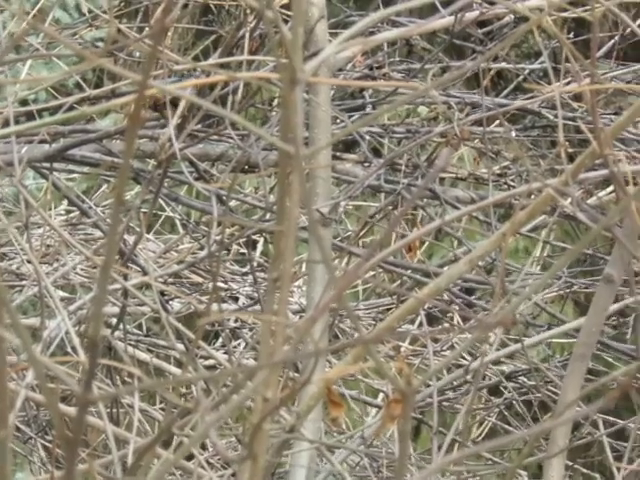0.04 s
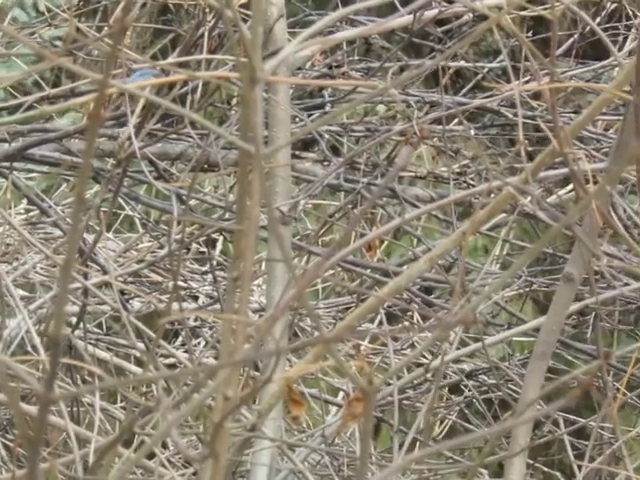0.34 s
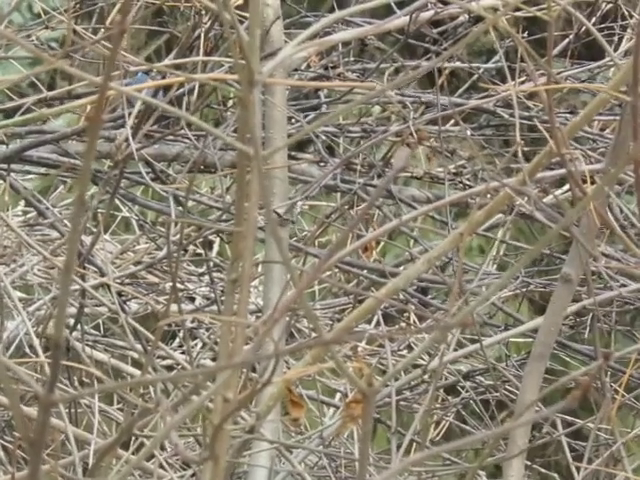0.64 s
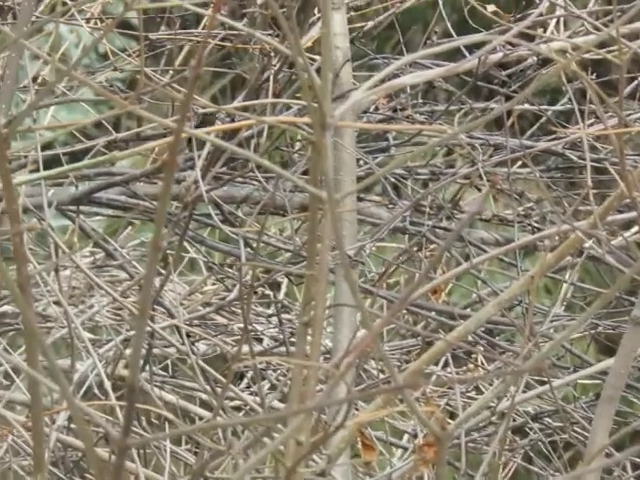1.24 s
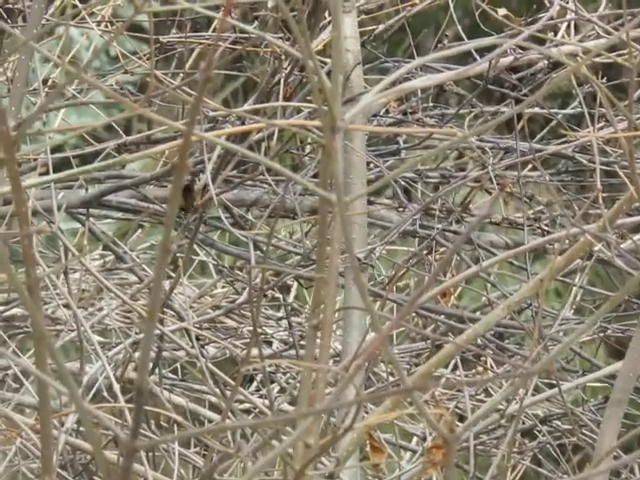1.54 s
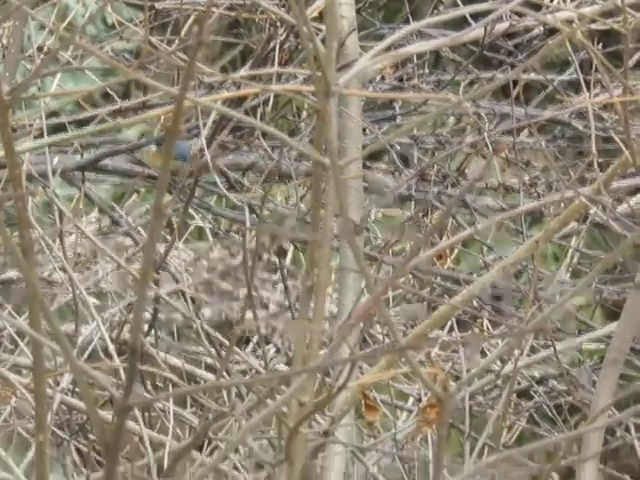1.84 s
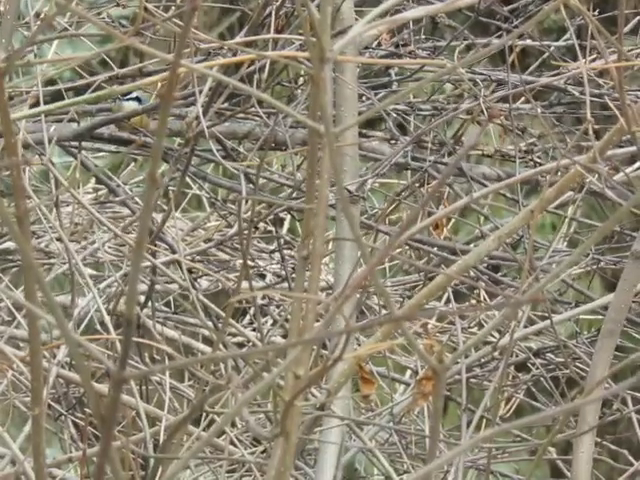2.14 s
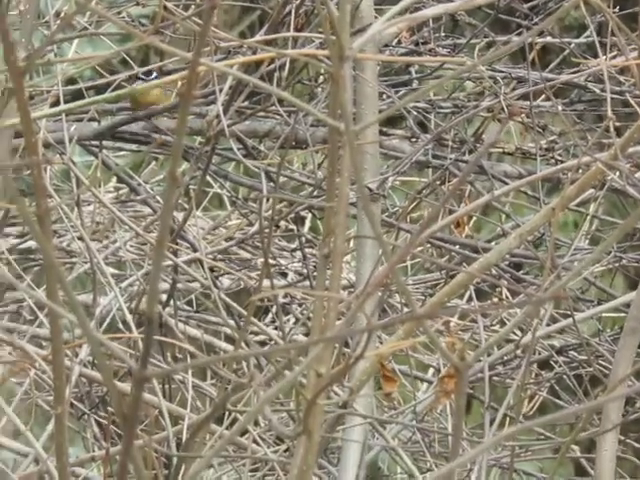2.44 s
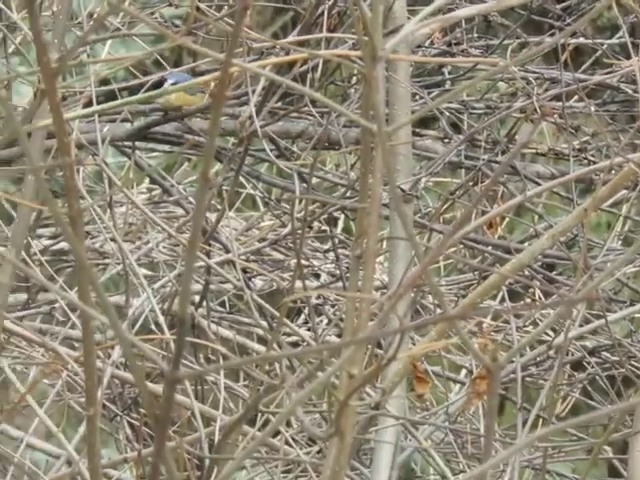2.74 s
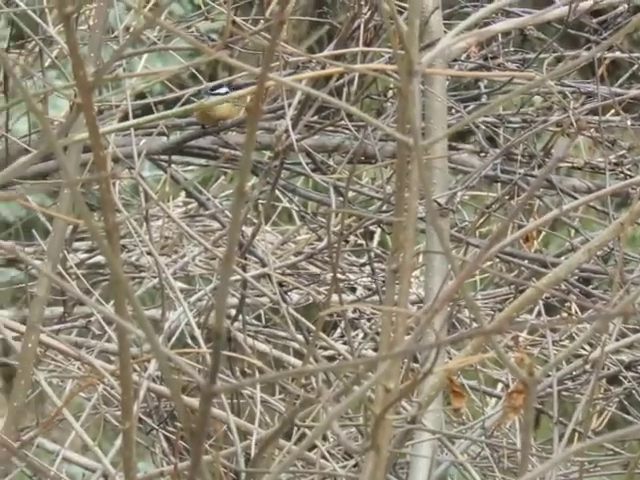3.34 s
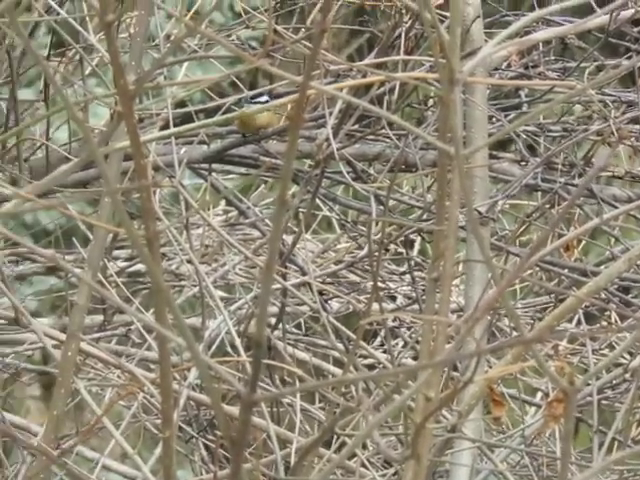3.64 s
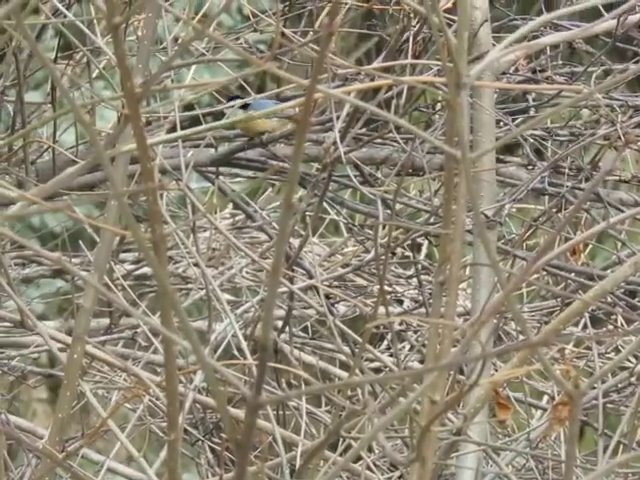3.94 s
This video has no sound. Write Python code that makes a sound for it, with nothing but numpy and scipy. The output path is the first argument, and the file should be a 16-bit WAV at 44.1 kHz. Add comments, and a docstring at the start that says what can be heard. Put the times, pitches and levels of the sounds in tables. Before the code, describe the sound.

A small bird repeats a short nasal call in a thicket, with faint high chirps.

```python
"""In a thicket, a nuthatch repeats a short nasal call about four times a second: pulses of air ring
its throat and bill. Early on come soft thuds and a run of dull, woody knocks with scraping between them.
A small songbird adds thin, high chirps and whistles, and twigs tick twice. Trunks and twigs scatter
these sounds back as echoes. Behind them lies a low, steady rush of distant air and traffic."""
import sys
import numpy as np
from scipy import signal
from scipy.fft import rfft, irfft, next_fast_len
from scipy.io import wavfile
from scipy.ndimage import map_coordinates

SR = 44100
rng = np.random.default_rng(int(sys.argv[2]) if len(sys.argv) > 2 else 0)


def transcribe(signal):
    """Save signal, clipped to [-1, 1], as a 16-bit WAV file at the path in sys.argv[1]."""
    frames = np.atleast_2d(signal).T
    limited = np.clip(frames, -1, 1)
    pcm = np.round(limited * 32767).astype(np.int16)
    wavfile.write(sys.argv[1], SR, pcm)


N = 176400
T = np.arange(N) / SR


# How the throat colours the voice: frequency_hz, gain_db
THROAT = [(500, -22), (1030, -12.5), (1550, -6.5), (2060, -7), (2580, -2.5), (3050, -3), (3600, -4),
          (4100, -10), (4640, -23), (5300, -30), (7000, -48)]
# Nasal calls: start_s, top_pitch_hz, level_db, low_overtones_db, upper_overtones_db, bill_ring_hz
NUTHATCH_CALLS = [(.267, 514.7, -48, -0.5, -1, 2400), (.583, 513, -44.5, -1, 2.5, 2780),
                  (.873, 512.7, -44.5, -4.5, 4.5, 2810), (1.155, 516, -44, -5.5, 5, 2880),
                  (1.38, 520.4, -42, -5, 2.5, 2980), (1.615, 521, -43.5, -5, 7, 2950),
                  (1.861, 519.3, -42.5, 0.5, 5, 2980), (2.134, 519, -43, 4, 4, 3050),
                  (2.39, 520.5, -41.5, 1, 1, 3110), (2.642, 523, -41, 1, 2, 3030),
                  (2.919, 519.2, -42.5, 1.5, 3, 2960), (3.145, 523, -42.5, 3, 0, 2870),
                  (3.412, 518.8, -41.5, 1.5, 1, 2950), (3.736, 513.4, -42.5, 3, 4.5, 2980),
                  (3.974, 522, -43.5, -0.5, 5, 2940)]

def nuthatch():
    """Pulses ring the throat; after a rough start the bill opens. Pitch and loudness arch together."""
    call_s, attack_s, release_s, rough_s = 0.066, 0.013, 0.012, 0.017
    bill_db, bill_width_hz, open_at_s, opening_s = 8.5, 540, 0.022, 0.0023
    crest = 0.6895  # the pitch peaks this far through the call
    size = int(call_s * SR)
    t = np.arange(size) / SR
    progress = t / call_s
    sag = 0.1587 * np.clip(1 - progress / crest, 0, 1) ** 2  # the pitch starts low and climbs
    sag += 0.237 * np.clip((progress - crest) / (1 - crest), 0, 1) ** 3.32  # then drops at the end
    roughness = np.exp(-(t / rough_s) ** 2)
    opening = (1 + np.tanh((t - open_at_s) / opening_s)) / 2
    fades = np.minimum(t / attack_s, 1) * np.minimum((call_s - t) / release_s, 1)
    harmonics = np.arange(1, 15)[:, None]
    smear = 0.183 * harmonics ** 2  # the overtones of a pulse arrive one after another
    out = np.zeros((2, N))
    for start_s, top_pitch_hz, level_db, low_db, upper_db, bill_hz in NUTHATCH_CALLS:
        jitter = (0.0068 + 0.035 * roughness) * wobble(458, size)
        phase = 2 * np.pi * np.cumsum(top_pitch_hz * (1 - sag + jitter)) / SR
        flicker = amp(1.3 * np.array([wobble(124, size) for _ in harmonics]))
        pulses = unit((flicker * np.cos(harmonics * phase - smear)).sum(0))
        pulsing_noise = unit(rng.standard_normal(size) * (1 + np.cos(phase)))
        rasp = (amp(-11) + amp(-2) * roughness) * pulsing_noise
        throat = lambda hz: (along(THROAT, hz) + np.interp(hz, (1800, 2510), [low_db, 0])
                             + np.interp(hz, (3350, 3860), [0, upper_db]))
        closed = resonate(pulses + rasp, throat)
        opened = resonate(closed, lambda hz: bill_db * np.exp(-((hz - bill_hz) / bill_width_hz) ** 2))
        voice = (closed + opening * (opened - closed)) / opened.std()
        loudness = amp(level_db - 15 * sag + 0.5 * wobble(227, size))  # lower pitch is softer
        add(out, start_s, thicket(voice * fades * loudness))
    return out


# The dull colour of wood: frequency_hz, gain_db
WOOD = [(80, -18.5), (450, -6.5), (630, 6), (930, -5), (1100, -1), (1480, -4.5), (1900, -16.5),
        (12000, -62)]
# Woody knocks: time_s, level_db, pitch_hz
KNOCKS = [(.423, -48, 896), (.487, -48, 684), (.496, -53.5, 750), (.559, -46.5, 817), (.628, -53, 605),
          (.657, -46, 929), (.694, -49.5, 758), (.794, -46.5, 596)]
# Soft, low thuds: time_s, level_db, pitch_hz
THUDS = [(.288, -43, 330), (.317, -43.5, 464), (.37, -46, 286), (.396, -42.5, 270)]
# Soft scrapes: time_s, level_db
SCRAPES = [(.47, -56), (.595, -55), (.655, -58)]

def knocks():
    """Each knock is a noisy contact plus a short ring. Thuds only ring, and scrapes are only noise."""
    contact = amp(1) * bursts(KNOCKS, WOOD, rise_s=0.0012, fall_s=0.006)
    body = amp(-0.5) * rings(KNOCKS, rise_s=0.0012, fall_s=0.015)
    thuds = rings(THUDS, rise_s=0.0012, fall_s=0.0074)
    scrapes = bursts(SCRAPES, WOOD, rise_s=0.022, fall_s=0.032)
    return contact + body + thuds + scrapes


def rings(blows, rise_s, fall_s):
    """Each blow sets off one tone that dies quickly and echoes in the thicket."""
    out, t = np.zeros(N), np.arange(SR // 10) / SR
    envelope = (1 - np.exp(-t / rise_s)) * np.exp(-t / fall_s)
    for time_s, level_db, pitch_hz in blows:
        add(out, time_s - rise_s, amp(level_db) * envelope * np.sin(2 * np.pi * pitch_hz * t))
    return thicket(out)[:, :N]


# Quick chirps: middle_s, lowest_pitch_hz, level_db, left_ear_delay_s
CHIRPS = [(1.0938, 6370, -47.5, 4.1e-5), (1.165, 6880, -43, 4.3e-5), (2.711, 6450, -53, -2.7e-5),
          (2.782, 6600, -51, -2.5e-5)]

def songbird_chirps():
    """High notes dip and climb again. Each reaches one ear first, so it seems to come from that side."""
    half_length_s, sweep_hz, octave_db = 0.0075, 4600, -19
    position = np.linspace(-1, 1, int(2 * half_length_s * SR))
    swell = np.cos(position * np.pi / 2) * (1 + position / 2)
    out = np.zeros((2, N))
    for middle_s, lowest_hz, level_db, delay_s in CHIRPS:
        pitch = lowest_hz + sweep_hz * position ** 2
        phase = 2 * np.pi * (np.cumsum(pitch) / SR + np.outer([-0.5, 0.5], delay_s * pitch))
        tone = np.sin(phase) + amp(octave_db) * np.sin(2 * phase)
        add(out, middle_s - half_length_s, thicket(amp(level_db) * swell * tone))
    return out


# Thin whistles: start_s, length_s, first_pitch_hz, target_pitch_hz, target_at_fraction, level_db
WHISTLES = [(1.648, 0.043, 6600, 7260, 1, -54.5), (1.879, 0.062, 6050, 6920, .65, -57),
            (1.968, 0.033, 5200, 5730, 0.66, -59.5), (2.748, .11, 3150, 3450, .65, -62),
            (3.002, 0.053, 6500, 7150, .9, -68), (3.402, 0.1, 11500, 11300, 0.6, -65.5)]

def songbird_whistles():
    """Pure, wavering notes from farther off, most of them gliding upward."""
    out = np.zeros((2, N))
    for start_s, length_s, first_hz, target_hz, target_at, level_db in WHISTLES:
        progress = np.linspace(0, 1, int(length_s * SR))
        glide = target_hz + (first_hz - target_hz) * (1 - progress / target_at) ** 2
        pitch = glide * (1 + 0.008 * wobble(563, len(progress)))
        swell = np.sqrt(np.abs(np.sin(np.pi * progress)))
        note = amp(level_db) * swell * np.sin(2 * np.pi * np.cumsum(pitch) / SR)
        add(out, start_s, thicket(note, direct_db=-4))
    return out


# The bright colour of a twig: frequency_hz, gain_db
TWIG = [(1000, -30), (5000, 1), (9500, 4), (13000, -3), (16000, -3)]
# Twig ticks: time_s, level_db
TICKS = [(.3195, -55.5), (2.052, -57)]

def twigs():
    """Each twig ticks with a tiny, bright puff of noise."""
    return bursts(TICKS, TWIG, rise_s=0.0009, fall_s=0.0018)


# How long the wood's echo takes to fade by 60 dB: frequency_hz, fade_s
ECHO_FADE = [(300, 0.31), (1500, 0.19), (3000, 0.26), (7000, 0.053), (12000, 0.05)]
# Twigs throw back the treble best: frequency_hz, gain_db
SCATTER = [(1800, -1.5), (3000, 1), (3600, 1), (8000, 1)]

def thicket(x, direct_db=0):
    """A sound and its stereo echoes from near branches, the wood around and, faintly, far away."""
    delay_s, side_db = 0.01, -11
    hz, t, hiss = signal.stft(rng.standard_normal((3, 2, SR * 3 // 4)), SR, nperseg=256)
    levels_db = [-11, -16, -19]  # near, around, far
    fades_s = [0.084, along(ECHO_FADE, hz)[:, None], 0.95]
    tails = 0
    for part, level_db, fade_s in zip(hiss, levels_db, fades_s):
        tail = signal.istft(part * amp(-60 * t / fade_s), SR, nperseg=256)[1]
        tails = tails + amp(level_db) * tail / np.linalg.norm(tail[0])
    mid, side = [resonate(tail, lambda f: along(SCATTER, f)) for tail in tails]
    side = side * amp(side_db)
    echo = np.pad([mid + side, mid - side], ((0, 0), (round(delay_s * SR) + 1, 0)))
    echo[:, 0] = amp(direct_db)  # the sound that comes straight to the ears
    return signal.fftconvolve(np.atleast_2d(x), echo, axes=1)


# The deep colour of the rush: frequency_hz, relative_db
RUSH = [(15, -52), (25, -19), (153, 0), (390, 0), (614, -3), (702, -5.5), (917, -3.5), (1020, -8),
        (1990, -13.5), (2700, -17), (4310, -20.5), (11900, -33), (13600, -43.5), (14700, -58)]
# How wide the rush spreads between the ears: frequency_hz, side_over_mid_db
RUSH_WIDTH = [(25, -8), (125, 0), (250, 7.5), (500, 4.5), (2500, 2), (5000, 1), (12000, 1)]
# Drones within the rush: pitch_hz, width_hz, level_db
DRONES = [(264.3, 30, -68), (920, 42, -66.5)]

def distant_rush():
    """Far-off air and traffic make a wide, steady noise with two narrow drones in it."""
    rush_db = -51.5
    mid = noise(RUSH)  # the same in both ears
    side = filtered(noise(RUSH), lambda hz: amp(along(RUSH_WIDTH, hz)))  # opposite in the two ears
    rush = amp(rush_db) * unit(np.array([mid + side, mid - side]))
    for pitch_hz, width_hz, level_db in DRONES:
        band = lambda hz: 1 / (1 + (2 * (hz - pitch_hz) / width_hz) ** 2)
        rush += amp(level_db) * unit(filtered(rng.standard_normal((2, N)), band))
    return rush


def bursts(events, spectrum, rise_s, fall_s):
    """Short puffs of noise ring on briefly in their own colour and echo in the thicket."""
    envelope = sum(amp(level_db) * np.exp(-np.maximum((time_s - T) / rise_s, (T - time_s) / fall_s))
                   for time_s, level_db, *_ in events)
    hiss = rng.standard_normal(N)
    colour = lambda x: resonate(x, lambda hz: along(spectrum, hz), size=4096)
    return thicket(colour(envelope * hiss) / colour(hiss).std())[:, :N]


def amp(db):
    """Turn decibels into a number to multiply by."""
    return 10 ** (np.asarray(db) / 20)


def unit(x):
    """Scale a sound to an average strength (rms) of 1."""
    return x / np.sqrt(np.mean(x ** 2) + 1e-20)


def along(points, hz):
    """Read between the rows of a (frequency_hz, value) table, with octaves evenly spaced."""
    frequencies, values = np.transpose(points)
    return np.interp(np.log(hz + 1), np.log(frequencies + 1), values)


def wobble(rate, size):
    """A smooth curve through `rate` random points a second."""
    points = rng.standard_normal(int(size * rate / SR) + 4)
    return map_coordinates(points, [np.arange(size) * rate / SR])


def filtered(x, gain):
    """Multiply each frequency in a sound by gain(hz)."""
    size = next_fast_len(N + SR // 2)
    return irfft(rfft(x, size) * gain(np.fft.rfftfreq(size, 1 / SR)), size)[..., :N]


def noise(spectrum):
    """Noise of strength 1 in the given colour."""
    return unit(filtered(rng.standard_normal(N), lambda hz: amp(along(spectrum, hz))))


def resonate(x, gain_db, size=1024):
    """Colour a sound by gain_db(hz), so that it rings after each push and never before."""
    cepstrum = irfft(np.log(amp(gain_db(np.fft.rfftfreq(size, 1 / SR)))))
    cepstrum[1:size // 2] *= 2  # move all the ringing to after the push
    cepstrum[size // 2 + 1:] = 0
    ring = irfft(np.exp(rfft(cepstrum)))
    return signal.fftconvolve(x, ring)[:len(x)]


def add(track, start_s, x):
    """Mix a sound into the track at start_s."""
    part = track[..., max(round(start_s * SR), 0):][..., :x.shape[-1]]
    part += x[..., :part.shape[-1]]


def scene():
    """The twigs, the distant rush, the knocks and the birds, heard together."""
    return twigs() + distant_rush() + knocks() + nuthatch() + songbird_chirps() + songbird_whistles()


def record(dry):
    """Cut away the very highest treble."""
    top_hz = 14400
    return filtered(dry, lambda hz: hz < top_hz)


dry = scene()
out = record(dry)
transcribe(out)
```